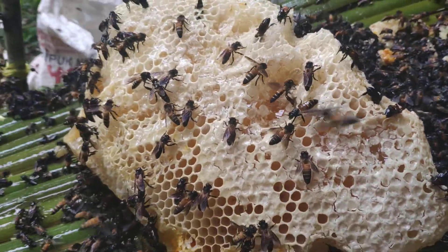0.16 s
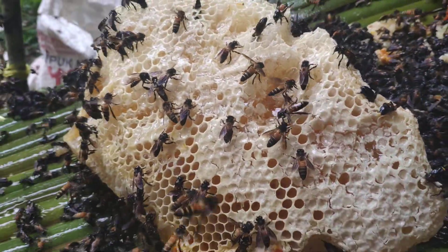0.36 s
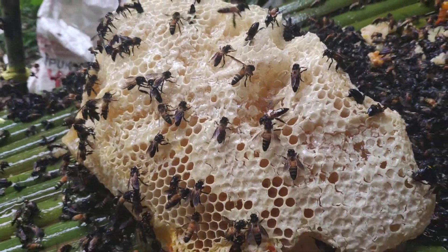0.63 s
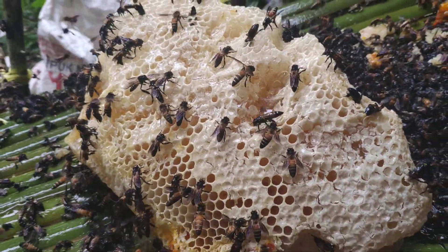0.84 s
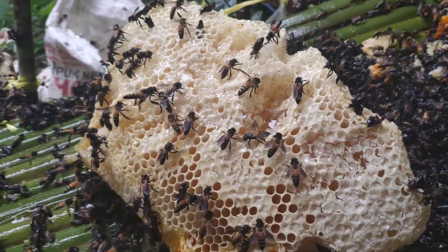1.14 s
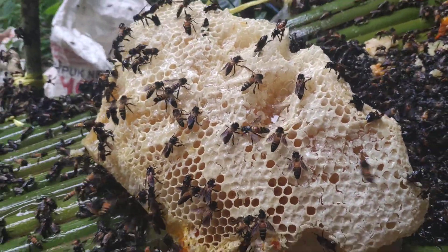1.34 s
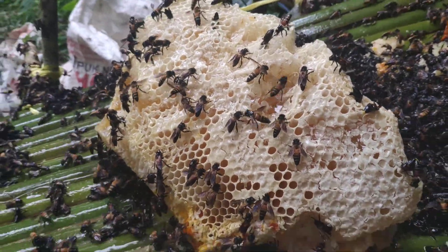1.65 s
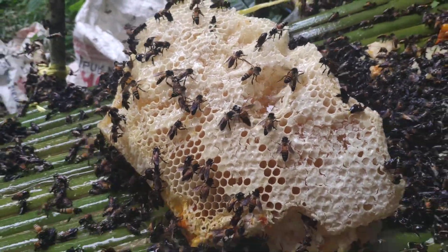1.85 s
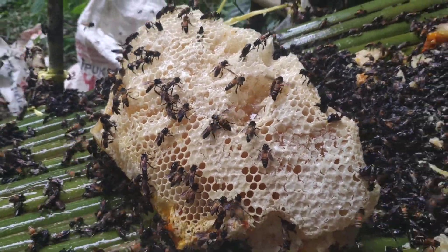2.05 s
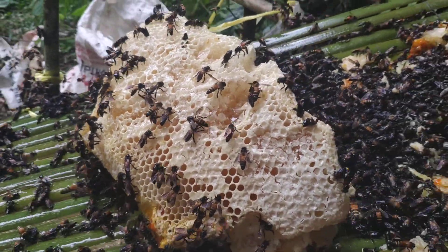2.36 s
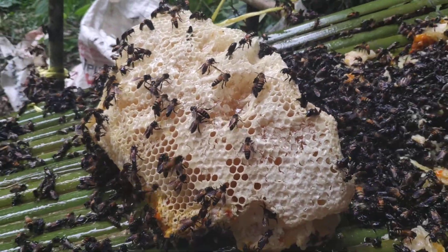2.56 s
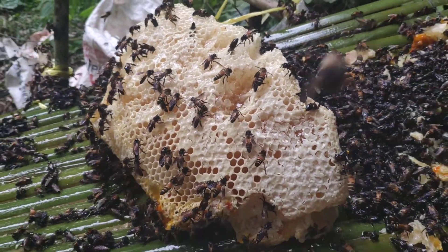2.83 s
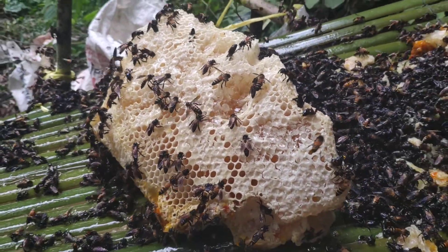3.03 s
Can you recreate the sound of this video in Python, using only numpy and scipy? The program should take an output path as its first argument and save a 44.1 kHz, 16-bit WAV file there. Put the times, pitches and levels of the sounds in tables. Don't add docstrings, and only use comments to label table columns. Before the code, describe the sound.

Continuous low buzzing of many bees over a crisp, airy hiss of feet and wings. Brief wing flutters pass, mostly right of centre; a few hard clicks come midway, and close passes crowd the end. Close, dry, outdoors.

```python
import sys
import numpy as np
from scipy import signal
from scipy.io import wavfile
from scipy.ndimage import uniform_filter1d

SR = 44100
rng = np.random.default_rng(int(sys.argv[2]) if len(sys.argv) > 2 else 0)


def persist_wave(psi):
    counts = np.round(np.clip(psi, -1, 1) * 32767).astype(np.int16)
    wavfile.write(sys.argv[1], SR, np.atleast_2d(counts).T)


def how_loud(loudness_db):
    steps = np.asarray(loudness_db, float) / 20
    return 10 ** steps


N = 140679
SLOW = 8


def even(x):
    return x / np.sqrt(np.mean(x ** 2) + 1e-20)


def read(points, x):
    place, value = np.transpose(points)
    return np.interp(np.log(x + 1), np.log(place + 1), value)


def wander(t, top_hz, count):
    hz = np.geomspace(.3, top_hz, 12)
    phase = rng.random((count, 12, 1))
    sines = np.sin(2 * np.pi * (hz[:, None] * t + phase))
    return even((sines / np.sqrt(hz)[:, None]).sum(1))


def wings(t, hz, partials, pan_db, lag_s, count, sway_db=0):
    turns = np.cumsum(hz) * SLOW / SR + rng.random()
    multiple = np.arange(1, count + 1)[:, None]
    height = -how_loud(read(partials, multiple) + sway_db)
    phase = 0.14 * rng.standard_normal((count, 1))
    ports = []
    for lag in (lag_s, 0):
        angle = 2 * np.pi * (multiple * (turns - hz * lag) + phase)
        ports.append((height * np.cos(angle)).sum(0))
    return np.sqrt(2) * np.array(ports) * how_loud(np.minimum([[pan_db], [-pan_db]], 0))


# multiple of the wingbeat, level in dB.
FAR_WINGS = [(1, -12), (2, -3), (3, -16.5), (4, -19), (5, -15), (6, -17), (8, -23.5), (11, -27), (16, -27)]
# time in seconds, level in dB.
SWARM_THICKNESS = [(0, 2.5), (.3, 2.7), (.6, -1.5), (.9, -0.2), (1.2, -0.5), (1.45, -2.7), (1.7, 0),
                   (1.95, -2), (2.2, -1.5), (2.45, 4), (2.7, 1), (2.95, 2), (3.19, 2)]


def swarm(t):
    low_hz, high_hz, bees = 119.06, 156.57, 32
    draw = rng.random((bees, 3))
    drift, sway = wander(t, 16, count=bees), wander(t, 14, count=bees)
    out = 0
    for k, (pitch, side, lag) in enumerate(draw):
        hz = low_hz + (high_hz - low_hz) * ((k + pitch) / bees) ** 1.25
        hz = hz * (1 + .03 * drift[k])
        lag_s = -0.00029 + 0.00045 * (2 * lag - 1)
        bee = wings(t, hz, FAR_WINGS, 14 * (side - .5), lag_s, count=16)
        out = out + how_loud(3 * sway[k]) * bee
    left_db = -1 * np.array([[1], [0]])
    return how_loud(-39.5 + np.interp(t, *np.transpose(SWARM_THICKNESS)) + left_db) * even(out)


def turning(t):
    upper = (np.arange(10) > 0)[:, None]
    return upper, 4 * wander(t, 35, count=10)


def flutter(t):
    return 1 + 0.01107 * wander(t, 39.9, count=1)[0]


# multiple of the wingbeat, level in dB.
NEAR_WINGS = [(1, -0.5), (2, -11.5), (3, -16), (4, -19.5), (5, -19), (6, -20.5), (7, -38), (10, -29)]
# time in seconds, wingbeat in Hz, level in dB, overtones in dB as it turns.
HOVER_PATH = [(.4, 128, -55, -7), (.62, 126.4, -43.5, 8.5), (0.762, 131, -40.5, -2),
              (0.841, 133.1, -33, 0.5), (.89, 126.9, -32, -3.5), (1.03, 129.3, -31, -3),
              (1.08, 126.8, -42.5, 4.5), (1.202, 134.3, -37.5, 6), (1.39, 126.7, -50, 9.5),
              (1.48, 131.2, -35, 0), (1.619, 127.1, -51.5, 5), (1.73, 131.5, -39, 0.5),
              (1.87, 131.2, -33, -5), (1.959, 132.4, -49, 9), (2.12, 127.6, -41.5, -1),
              (2.45, 126.7, -41, 1), (2.7, 129.5, -40, -15), (2.82, 127.2, -52, 5)]


def hovering_bee(t):
    s, hz, db, over_db = np.transpose(HOVER_PATH)
    upper, sway_db = turning(t)
    fade = np.clip(np.minimum(t - s[0], s[-1] - t) / 0.15 + 1, 0, 1)
    level = fade * how_loud(np.interp(t, s, db) + 6.5)
    beat_hz = np.interp(t, s, hz) * flutter(t)
    sway_db = upper * (sway_db + np.interp(t, s, over_db))
    return level * wings(t, beat_hz, NEAR_WINGS, -37, -.0004, count=10, sway_db=sway_db)


# middle in seconds, width in seconds, wingbeat in Hz, level in dB,
# left-right balance in dB (minus is right).
CLOSE_PASSES = [(.11, 0.057, 138, -38, -13), (0.491, 0.015, 137, -35, -19), (0.65, 0.046, 140.5, -30.5, 16),
                (0.998, 0.16, 151, -45, -1), (1.43, 0.099, 136, -46, 18), (2.139, 0.029, 120, -35.5, -4),
                (2.88, 0.023, 130, -37, -4), (2.98, 0.037, 130, -35, -8), (3.16, 0.03, 132, -36, 12),
                (3.07, 0.014, 138.5, -30, -12), (.2, 0.02, 149, -41, -7), (2.039, 0.032, 129, -45, -5)]


def passing_bees(t):
    upper, sway_db = turning(t)
    unsteady = flutter(t)
    out = 0
    for mid, width, hz, db, pan_db in CLOSE_PASSES:
        shape = how_loud(db) / (1 + ((t - mid) / width) ** 4)
        beat_hz = hz * unsteady * (1 + .1 * (t - mid))
        bee = wings(t, beat_hz, NEAR_WINGS, pan_db, 0, count=10, sway_db=upper * (-1 - sway_db))
        out = out + shape * bee
    return out


# multiple of the wingbeat, level in dB.
BANKED_WINGS = [(1, -8), (2, 0.5), (3, -10), (4, -15), (6, -18), (8, -20)]
# start in seconds, length in seconds, level in dB,
# second partial in Hz, left-right balance in dB (minus is right).
BANKING_FLASHES = [(0.004, 0.088, -37.5, 280.7, 1), (0.325, 0.071, -39, 260.6, -4),
                   (0.463, 0.065, -36.5, 250, -3), (0.634, 0.063, -38.5, 294, 9),
                   (0.75, 0.029, -37.5, 256, -2), (0.841, 0.099, -36, 255, -20.5),
                   (0.954, 0.063, -35.5, 267, -7), (1.152, 0.063, -44.5, 266, -14),
                   (1.327, 0.035, -33.5, 274, -8.5), (1.404, 0.064, -35, 272, -4),
                   (1.544, 0.044, -34.5, 266, 0), (1.604, 0.04, -32.5, 256, -6),
                   (1.736, 0.068, -34, 265.5, -7.5), (1.825, 0.036, -35.5, 266, -3.5),
                   (2.052, 0.097, -36, 262.2, -6.5), (2.167, 0.092, -37, 269.5, -6),
                   (2.321, 0.047, -38, 254.6, -2.0), (2.386, 0.043, -37.5, 272.7, -6),
                   (2.532, 0.078, -43, 287, -8), (2.631, 0.028, -37.5, 255, -13),
                   (2.706, 0.045, -36.5, 296.3, 0.5), (2.755, 0.035, -35, 293.7, 0),
                   (2.856, 0.025, -35.5, 272, -1.5), (2.975, 0.048, -41, 272.7, 6),
                   (3.127, 0.038, -40, 262, -6)]


def banking_bees(t):
    out = 0
    for start, length, db, second_hz, pan_db in BANKING_FLASHES:
        u = (t - start - length / 2) / (0.51 * length)
        glide = .04 * rng.uniform(-1, 1) * np.tanh(u)
        unsteady = 0.0149 * wander(t, 30.01, count=1)[0]
        beat_hz = second_hz / 2 * (1 + glide + unsteady)
        level = how_loud(db - 2.5 + abs(pan_db) / 2) * np.exp(-u ** 4)
        out = out + level * wings(t, beat_hz, BANKED_WINGS, pan_db, -0.00033, count=8)
    return out


# time in seconds, level in dB, left-right balance in dB (minus is right),
# centre in Hz.
TAPS = [(1.1037, -24, -12, 9000), (1.2589, -21, -3, 6000), (1.2599, -27, -3, 8800),
        (1.7224, -10.5, -20, 14500), (1.7302, -14, -20, 14000), (1.7366, -21, -20, 9000),
        (1.7415, -16, -20, 14000), (1.9113, -10.5, 7, 10000), (3.185, -24, -3, 9000),
        (1.2667, -26, -3, 6000), (1.2795, -25, -3, 6500), (1.2972, -31, -3, 8800), (1.9115, -21, 0, 4600),
        (2.575, -25, -3, 8000)]


def ticks():
    tap_s, lag_s, rattle_db, rattle_t60_s = .00006, .0005, -23, .025
    out, t = np.zeros((2, N)), np.arange(1200) / SR
    u = t - 3 * tap_s
    for s, db, pan_db, hz in TAPS:
        tap = np.exp(-(u / tap_s) ** 2) * np.sin(2 * np.pi * hz * u + 1)
        rattle = how_loud(rattle_db - 60 * t / rattle_t60_s) * rng.standard_normal((2, 1200))
        for c, side_db in enumerate((pan_db, -pan_db)):
            late_s = lag_s * min(max(-side_db / 6, 0), 1)
            part = out[c, round((s + late_s) * SR):][:1200]
            sound = tap + np.convolve(rattle[c], tap[:30])[:1200]
            part += how_loud(db + min(side_db, 0)) * sound[:len(part)]
    return out


# pitch in Hz, level in dB per Hz.
HISS_COLOUR = [(20, 14.5), (55, -17), (100, 15.5), (500, 11.5), (1000, 7), (3000, 1.5), (7000, -2),
               (15500, 1)]
# pitch in Hz, likeness (1 same, 0 unrelated,
# below 0 opposed).
PORT_LIKENESS = [(30, 0.2), (100, 0.67), (500, 0.6), (900, 0.44), (1400, -.3), (2200, -.15), (3500, 0)]
# time in seconds, level in dB, left-right balance in dB (minus is right).
COMB_BUSTLE = [(0, -32, -3.5), (.45, -31.5, -4), (.65, -31.5, -4), (.78, -31.5, -5), (.92, -30.5, -5.5),
               (1.05, -31, -3.5), (1.151, -31, -4.5), (1.35, -31.5, -5), (1.6, -31.5, -4), (1.75, -29, -6),
               (1.95, -30.5, -4.5), (2.2, -30.5, -4), (2.4, -31.5, -4.5), (2.57, -30.5, -3.5),
               (2.699, -32, -3.5), (2.95, -32, -3.5), (3.19, -31, -4)]


def hiss():
    frames, hz = N // 256 + 5, np.fft.rfftfreq(1024, 1 / SR)
    a, b, c, d, patch = rng.standard_normal((frames, 513, 5)).T
    patch = even(uniform_filter1d(uniform_filter1d(patch, 40, 0), 10, 1))
    same = np.clip(read(PORT_LIKENESS, hz), -1, 1)[:, None]
    shared, other = a + 1j * b, c + 1j * d
    left = shared * np.exp(2j * np.pi * hz * .00004)[:, None]
    right = same * shared + np.sqrt(1 - same ** 2) * other
    spectrum = np.array([left, right]) * how_loud(read(HISS_COLOUR, hz)[:, None] + 0.92 * patch)
    wash = even(signal.istft(spectrum, nperseg=1024, noverlap=768)[1][:, :N])

    size = how_loud(1.1 * np.minimum(rng.exponential(1, (2, N)), 3.5)) * rng.choice([-1., 1.], (2, N))
    struck = rng.random((2, N)) < 2500 / SR
    crackle = signal.lfilter([1, -.9], [1], size * struck)

    s, db, pan_db = np.transpose(COMB_BUSTLE)
    t = np.arange(0, N, 64) / SR
    left_db = (np.interp(t, s, pan_db) + 1.4) * [[1], [0]]
    level_db = np.interp(t, s, db) - 5 + left_db + 0.31 * wander(t, 25.43, count=2)
    level = how_loud(uniform_filter1d(np.repeat(level_db, 64, axis=1)[:, :N], size=64))
    return level * (wash + how_loud(-4.5) * even(crackle))


def scene():
    t = np.arange(N // SLOW + 2) * SLOW / SR
    hum = swarm(t) + hovering_bee(t) + passing_bees(t) + banking_bees(t)
    return signal.resample_poly(hum, SLOW, 1, axis=1)[:, :N] + ticks() + hiss()


def low_pass(x):
    return signal.sosfilt(signal.butter(12, 15750, fs=SR, output="sos"), x)


# pitch in Hz, width in Hz, level in dB over the plain path.
PORT_RINGS = [
    [(7150, 450, 9.5), (9510, 950, 18)],
    [(7140, 260, 4), (8490, 980, 20.5)],
]


def record(dry):
    out = dry.copy()
    for c, port in enumerate(PORT_RINGS):
        for hz, width, db in port:
            out[c] += how_loud(db) * signal.lfilter(*signal.iirpeak(hz, hz / width, SR), dry[c])
    out = signal.oaconvolve(out, signal.firwin(511, 15900, fs=SR)[None], "same")
    return low_pass(out)


dry = scene()
out = record(dry)
persist_wave(out)
```